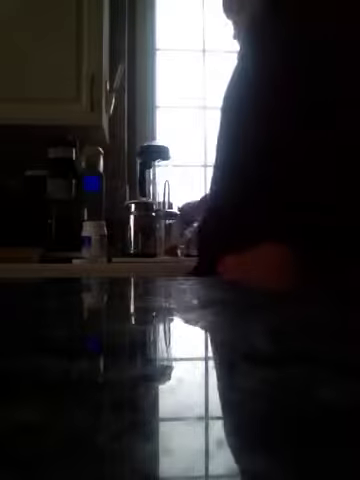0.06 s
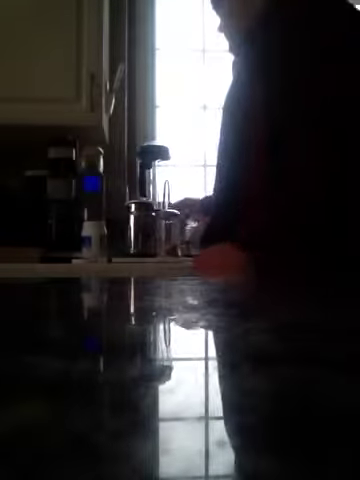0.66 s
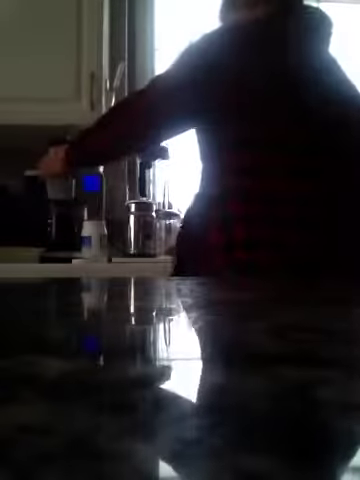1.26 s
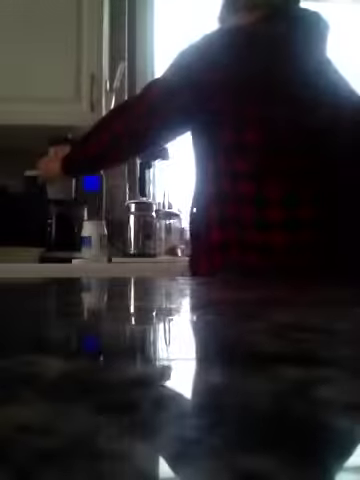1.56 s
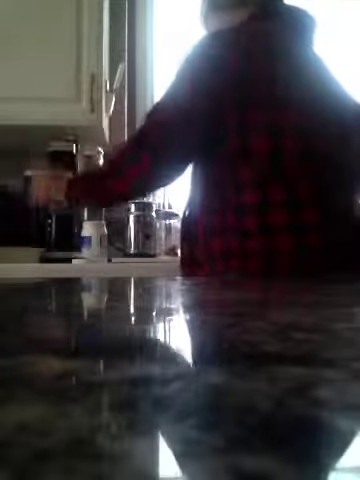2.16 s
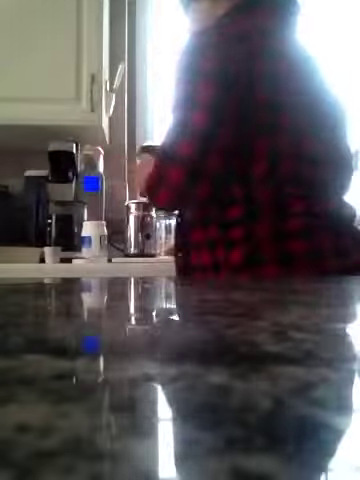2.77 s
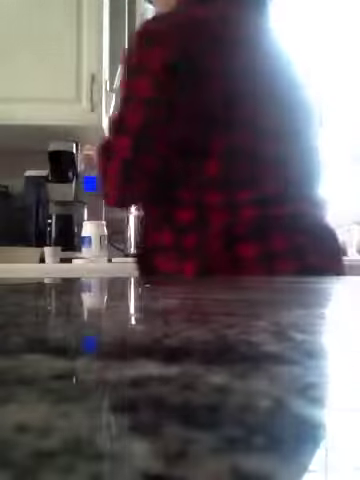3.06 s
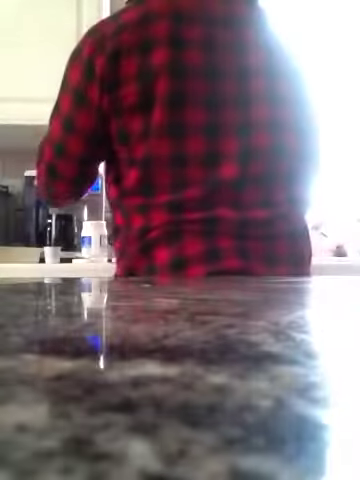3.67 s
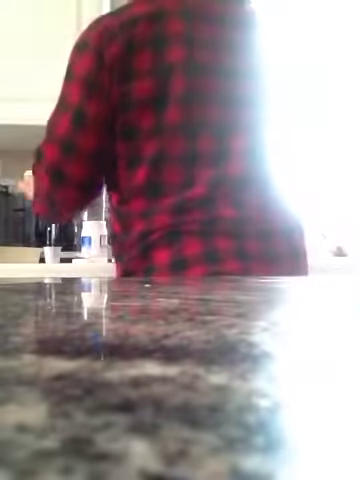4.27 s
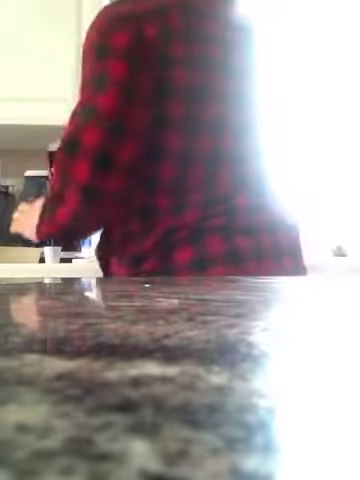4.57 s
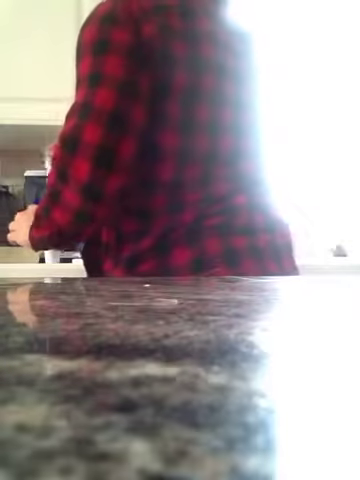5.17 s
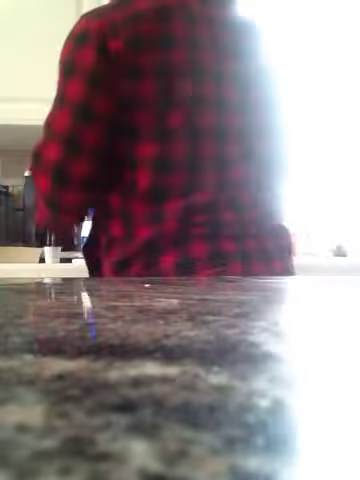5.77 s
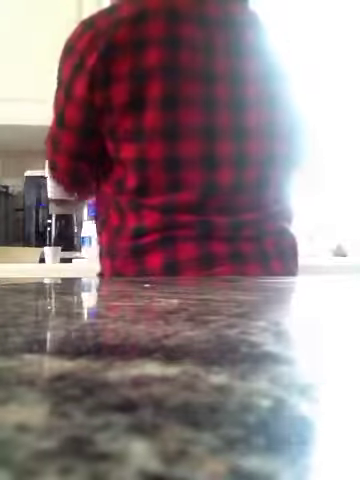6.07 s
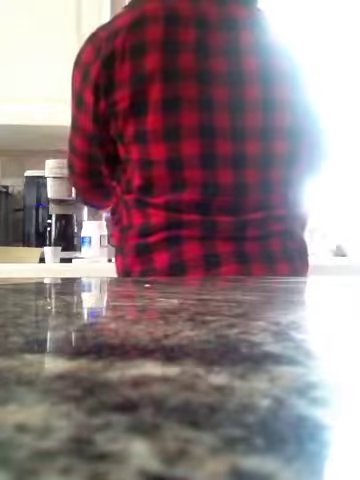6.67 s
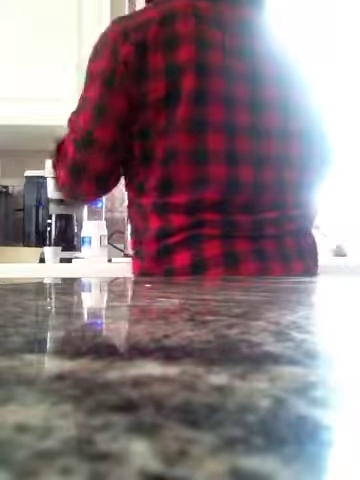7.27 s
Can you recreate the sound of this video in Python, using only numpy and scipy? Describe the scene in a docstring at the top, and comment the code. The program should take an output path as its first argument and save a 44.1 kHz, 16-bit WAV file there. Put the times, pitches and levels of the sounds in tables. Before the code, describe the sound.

Someone loads a single-cup coffee maker in a hard, echoing kitchen, a few steps from the microphone. Crockery clatters briefly, the plastic lid clicks and rubs open, and a cup is set on the counter. A pod is pressed in with small knocks, then a part slides and shuts with a loud clack. A click, soft knocks and a faint squeak follow over quiet room noise.

```python
"""Someone loads a single-cup coffee maker in a hard, echoing kitchen, a few steps from the microphone.
First crockery is picked up, then the plastic lid clicks and rubs open and a cup is set on the counter.
A pod is pressed in, and a part slides and shuts with a loud clack. A click, a few soft knocks and a
faint squeak come last. Each hit is a short burst of noise plus the ringing of the object that was hit;
rubbing is a stream of tiny slips. Quiet room noise lies under it all."""
import sys
import numpy as np
from scipy import signal
from scipy.fft import rfft, irfft, next_fast_len
from scipy.io import wavfile
from scipy.ndimage import uniform_filter1d

SR = 44100
rng = np.random.default_rng(int(sys.argv[2]) if len(sys.argv) > 2 else 0)


def persist_wave(psi):
    """Save psi, clipped to +-1, as 16-bit WAV."""
    counts = np.round(np.clip(psi, -1, 1) * 32767).astype(np.int16)
    wavfile.write(sys.argv[1], SR, np.atleast_2d(counts).T)


N = 331852

# The hits on each object: (time [s], level [dB], brightness [dB per octave])
NUDGE_HITS = [(.200, -59.5, 0), (.268, -59.5, -1.3), (.356, -56.5, -0.71), (.545, -51, 0.54),
              (.570, -55.5, 0.27), (.600, -69, .5)]
TICK_HITS = [(.3903, -49.5, -2.5), (.3972, -49, -1.5), (.4086, -46.5, 0), (.4153, -43.5, 3),
             (.523, -56, 14)]
CROCKERY_HITS = [(.7405, -39.5, 2), (.7473, -33, 2.5), (.7532, -38, -2.2), (.762, -42.5, 4.5),
                 (.7845, -52, -2.5)]
LID_HITS = [(1.504, -58.5, 4), (1.592, -47, 1.1), (1.668, -51.5, -0.8), (1.883, -50, 1.3),
            (1.9905, -38.5, 2.5), (2.035, -44.5, 0), (2.161, -48, 4), (2.896, -56, 0.4)]
BUMP_HITS = [(1.517, -54.5, -0.089), (1.547, -60, 0.8), (1.644, -53.5, 0.95), (1.690, -51.5, -0.16),
             (1.836, -51, 0.43), (1.981, -47, -1.06), (2.135, -63, -1)]
SNAP_HITS = [(1.389, -53.5, 1), (1.572, -52, -1.5), (1.975, -52, -1), (3.9705, -48, 0.5),
             (3.978, -46, -1.5), (4.050, -59.5, 2.5), (4.894, -46.5, 0), (4.925, -52, -2.5),
             (4.968, -51.5, 2), (4.985, -45.5, 0)]
CUP_HITS = [(2.4353, -33, 0)]
POD_HITS = [(3.5225, -47, -5), (3.529, -47, 3), (3.555, -61, 5), (3.613, -49, -5), (3.666, -64, -5),
            (3.672, -39, -1), (3.698, -61, 10.5), (3.742, -70, 5), (3.792, -47, 0)]
CLINK_HITS = [(3.786, -50.5, 0)]
LATCH_HITS = [(5.2002, -47, 5), (5.2065, -46.5, 2), (5.214, -31, 3.5), (5.2205, -32, 1.5),
              (5.236, -38, 3.5), (5.258, -32, -1.5), (5.269, -26, -3.5), (5.287, -18.5, -4.5)]
CLACK_HITS = [(5.2815, -18.5, 0.5), (5.2882, -19, 0.99), (5.291, -17, -0.4), (5.302, -23.5, -1),
              (5.317, -26, 1.5), (5.353, -31.5, 0.91)]
SWITCH_HITS = [(5.797, -50, 0.92), (5.802, -46.5, 0)]
THUD_HITS = [(6.317, -63, 1), (6.322, -48, -1.6)]
KNOCK_HITS = [(6.538, -53.5, 0.84), (6.549, -57, -0.11), (6.925, -66, -1.02), (6.947, -58, 0.098),
              (6.958, -54.5, -1.1)]

# The tone colour of each object's noise burst, from bass to treble: (frequency [Hz], level [dB])
NUDGE_TONE = [(100, -33), (300, -9), (470, -1.5), (930, 0), (1400, -6.5), (2000, -11), (4000, -10.5),
              (12000, -32)]
TICK_TONE = [(150, -41), (900, -2.5), (2000, -6.5), (2750, 7), (3300, 4), (4200, -3), (6500, -12.5),
             (9000, -21.5), (15000, -29)]
CROCKERY_TONE = [(80, -31), (200, -13.5), (350, -11.5), (500, -3), (950, 2), (1250, 5), (1650, -3.5),
                 (2500, 4), (3400, -0.5), (5000, -10.5), (8000, -19), (11500, -19.5), (15000, -31)]
LID_TONE = [(70, -21), (200, -13), (600, 5), (1300, -3.5), (1900, 1), (3000, -3.5), (6200, -7), (8200, -9),
            (10000, -3.5), (13000, -11), (15000, -24)]
BUMP_TONE = [(80, -25), (250, -6), (450, -20), (700, 10), (1100, -6.5), (3000, -9), (6000, -27),
             (15000, -45)]
SNAP_TONE = [(60, -30.5), (110, -12.5), (180, -0.5), (420, -3.5), (780, -1), (1300, -4.5), (2300, 0),
             (3500, -2), (6000, -13.5), (11500, -14.5), (15000, -25)]
CUP_TONE = [(40, -54), (70, -37), (100, -10), (250, -0.5), (650, -1), (950, -3.5), (1300, -1), (2000, -9),
            (3200, -11.5), (4500, -9.5), (7000, -15), (10000, -10), (15000, -23)]
POD_TONE = [(90, -39), (300, -6), (500, -9.5), (850, 6.5), (1400, -12), (3000, -16), (6000, -35),
            (12000, -40), (15000, -46)]
CLINK_TONE = [(150, -10), (1200, -4), (2000, -35), (4000, 5), (6000, -19), (11000, -1.5), (15000, -22)]
LATCH_TONE = [(100, -31), (200, -16.5), (520, -14), (780, 2.5), (1100, -11.5), (1600, -10), (2200, -1.5),
              (3300, -6), (4500, -23), (11000, -32.5), (15000, -43.5)]
CLACK_TONE = [(25, -46), (70, -38.5), (115, -26), (160, -11.5), (300, -1.5), (420, -3), (720, -5.5),
              (1050, 1), (1500, -6), (2200, -7.5), (3500, -11.5), (6000, -17), (11500, -18.5), (15500, -21)]
SWITCH_TONE = [(70, -20), (130, -10), (280, -0.5), (500, -6.5), (2000, -11), (6000, -13), (12000, -11.5),
               (15500, -17)]
THUD_TONE = [(90, -53), (300, -6.5), (410, 2), (600, -3), (1100, -6), (2000, -19), (4000, -28),
             (12000, -56)]
KNOCK_TONE = [(80, -38), (180, -7), (500, -1), (900, 4), (1400, -4.5), (2000, -3.5), (4000, -20.5),
              (12000, -44)]

# The notes each object rings with: (frequency [Hz], energy against the burst [dB], time to fade 60 dB [s])
TICK_NOTES = [(2900, -25, .03), (3240, -34, .1), (3580, -10, 0.073)]
CROCKERY_NOTES = [(915, -8.5, 0.059), (1255.4, -11.5, 0.27), (1980, -19, 0.2), (2550, -18, 0.11),
                  (2910, -19, .1), (3490, -19.5, 0.34)]
LID_NOTES = [(224, -12.5, 0.12), (319, -15, 0.17), (1857, -13, 0.086), (4760, -16.5, 0.1),
             (5700, -36, 0.11), (7550, -20, 0.072), (9420, -11.5, 0.15), (9200, -20, 0.078),
             (11100, -21, 0.11)]
BUMP_NOTES = [(683, -1.1, 0.055), (790, -0.22, 0.071)]
SNAP_NOTES = [(185, -23.5, 0.14), (335, -17, 0.45), (580, -22, 0.07), (773.4, -14.5, 0.074),
              (3830, -20.5, 0.07)]
CUP_NOTES = [(466, -9, 0.055), (665, -3.5, 0.03), (810, -13, 0.053), (1300, -17, 0.14), (1860, -15, 0.11),
             (2600, -14, 0.044), (3960, -17, 0.069), (4530, -20, 0.053), (6540, -17, 0.053),
             (8600, -14, 0.036)]
POD_NOTES = [(765, -1.5, 0.067), (898, -4, 0.16), (1010, -16, 0.048), (1280, -16, 0.082),
             (2290, -21, 0.071), (5290, -26, 0.069)]
CLINK_NOTES = [(1164, 3, 0.058), (2288, -13, 0.24), (3700, -5, 0.074), (4000, -12, .1), (7219, -13, .1),
               (10150, -21, .12)]
LATCH_NOTES = [(655, -7.5, 0.039), (790, 1.5, 0.029)]
CLACK_NOTES = [(202, -23.5, 0.19), (403.7, -12, 0.15), (452, -14, 0.067), (674, -11.5, 0.067),
               (704.7, -13.5, 0.097), (750, -13.5, 0.09), (1040, -16, 0.13), (1098, -24, 0.18),
               (1400, -25, 1), (1705, -16.5, 0.064), (1787, -16.5, 0.12), (2240, -23, .14),
               (2313, -21, 0.16), (3760, -21.5, 0.077), (4620, -23, .06)]
SWITCH_NOTES = [(678, -9, 0.07), (7150, -15, .1)]
THUD_NOTES = [(402, 1.8, 0.094)]
KNOCK_NOTES = [(421, -12, 0.092), (766, -8.5, 0.11), (1056, -19, .15)]

# Pushes of the hand that drag a part: (start [s], length [s], rubbing level [dB], rumble level [dB])
HAND_STROKES = [(0.257, 0.041, -59.5, -87), (0.558, 0.034, -58, -89), (1.42, .12, -65.5, -87),
                (1.582, 0.13, -65.5, -68.5), (1.82, 0.16, -61, -74.5), (2.02, 0.038, -58, -56.5),
                (2.11, 0.075, -63.5, -64.5), (3.617, 0.099, -59, -76), (4.727, 0.13, -63, -69.5),
                (4.872, .15, -54.5, -73), (7.402, 0.082, -83, -68)]
# The tone colour of rubbing plastic, the hollow housing and the room noise: (frequency [Hz], level [dB])
RUB_TONE = [(70, -32.5), (200, -7.5), (400, -10), (850, -2.5), (1400, -2.5), (2500, -3.5), (5000, -15.5),
            (12000, -15.5), (15500, -30.5)]
HOUSING_TONE = [(50, -33), (95, -8), (140, -8), (230, 1.5), (310, -1.5), (420, -6), (800, -22.5),
                (2000, -50.5)]
ROOM_TONE = [(15, -61), (25, -25.5), (69, -26.5), (104, -6.5), (173, 0), (267, 0.5), (340, -0.5),
             (445, -4.5), (703, -7), (804, -8.5), (895, -8), (1900, -10.5), (3440, -13), (14300, -12),
             (15500, -13)]
# How long sound hangs in the kitchen: (frequency [Hz], time to fade 60 dB [s])
KITCHEN_FADE = [(100, 0.5), (400, 0.53), (1200, 0.63), (2500, 0.61), (5000, 0.58), (9000, 0.37),
                (15000, 0.11)]
# Echoes from the counter, wall and cupboards: (delay [s], gain [factor])
NEAR_ECHOES = [(.0016, 0.27), (.0031, 0.15), (.0073, 0.33), (0.0102, 0.24), (0.0161, .25), (.021, .28)]


def shutting():
    """The latch catches and the part shuts with a clack, the loudest sound here."""
    latch = struck(LATCH_HITS, LATCH_TONE, LATCH_NOTES, burst_s=0.016, tail_db=-2)
    return latch + struck(CLACK_HITS, CLACK_TONE, CLACK_NOTES, burst_s=0.035, tail_db=-5)


def crockery():
    """Crockery is nudged gently, then ticks and rings as it is picked up."""
    nudges = struck(NUDGE_HITS, NUDGE_TONE, CROCKERY_NOTES, burst_s=0.059, tail_db=-2, contact_s=0.018)
    ticks = struck(TICK_HITS, TICK_TONE, TICK_NOTES, burst_s=0.018, tail_db=-4.5)
    clatter = struck(CROCKERY_HITS, CROCKERY_TONE, CROCKERY_NOTES, burst_s=0.031, tail_db=-4.5)
    return nudges + ticks + clatter


def cup_down():
    """A cup meets the counter in one hard hit."""
    return struck(CUP_HITS, CUP_TONE, CUP_NOTES, burst_s=0.015, tail_db=-4.5)


def lid():
    """The plastic lid clicks, bumps and snaps as the hand works it; the same snaps also carry the clicks of the
    sliding part just before it shuts."""
    clicks = struck(LID_HITS, LID_TONE, LID_NOTES, burst_s=0.025, tail_db=0.5)
    bumps = struck(BUMP_HITS, BUMP_TONE, BUMP_NOTES, burst_s=0.019, tail_db=-4.5, contact_s=0.004)
    snaps = struck(SNAP_HITS, SNAP_TONE, SNAP_NOTES, burst_s=0.032, tail_db=-1.5)
    return clicks + bumps + snaps


def pod():
    """The pod knocks as it is pressed in, with one bright clink near the end."""
    knocks = struck(POD_HITS, POD_TONE, POD_NOTES, burst_s=0.018, tail_db=-5.5, contact_s=0.003)
    return knocks + struck(CLINK_HITS, CLINK_TONE, CLINK_NOTES, burst_s=0.02, tail_db=-1)


def switch():
    """A switch clicks: two small hits, very close together."""
    return struck(SWITCH_HITS, SWITCH_TONE, SWITCH_NOTES, burst_s=0.034, tail_db=0, contact_s=0.0025)


def soft_knocks():
    """Gentle contacts make a dull thud and then a few knocks."""
    thud = struck(THUD_HITS, THUD_TONE, THUD_NOTES, burst_s=0.04, tail_db=-5.5, contact_s=0.0061)
    knocks = struck(KNOCK_HITS, KNOCK_TONE, KNOCK_NOTES, burst_s=0.039, tail_db=-3.5, contact_s=0.0031)
    return thud + knocks


def struck(hits, tone, notes, burst_s, tail_db, contact_s=0.00036, size=16384):
    """Each hit makes a burst of noise and rings the object, with its own loudness and brightness."""
    t, hz = np.arange(size) / SR, np.fft.rfftfreq(size, 1 / SR)
    body = tone_filter(look_up(tone, hz))
    # Little sound leaves the object below its lowest note.
    bass_cut = signal.butter(3, 0.7 * notes[0][0], "high", fs=SR, output="sos")
    rings = np.array([gain_of(db) * unit(np.sin(2 * np.pi * note_hz * t) * fade(t, fade_s))
                      for note_hz, db, fade_s in notes])
    octaves = np.log2(np.clip(hz, 300, 12000) / 1000)
    hit_scale = np.sqrt(0.02 * SR)  # a hit's level counts its energy as if spread over 20 ms
    out = np.zeros(N)
    for start, db, brightness in hits:
        noise = noise_burst(t[:size // 4], burst_s, contact_s)
        burst = unit(irfft(rfft(noise, size) * body))
        # Where the hit lands decides which way each note first swings.
        ring = signal.sosfilt(bass_cut, rng.choice([-1, 1], len(notes)) @ rings)
        hit = unit(irfft(rfft(burst + ring) * tone_filter(brightness * octaves)))
        # Each hit gets its own random room tail, so the echoes blur without ringing.
        add(out, start, kitchen(gain_of(db) * hit_scale * hit, tail_db))
    return out


def noise_burst(t, fade_s, contact_s):
    """Many short vibrations blur into noise that swells while two surfaces meet, then fades."""
    envelope = (1 - np.exp(-t / contact_s)) * fade(t, fade_s)
    return flattened(rng.standard_normal(len(t)) * envelope, bins=41)


def rubbing(slips_per_s=2500, spread_db=1.5):
    """Plastic sticks and slips on plastic in tiny uneven clicks, which also shake the hollow housing."""
    slips = (rng.random(N) < slips_per_s / SR) * rng.standard_normal(N)
    slips *= gain_of(spread_db * np.minimum(rng.exponential(1, N), 4))
    drag, push = np.zeros(N), np.zeros(N)
    for start, length, rub_db, rumble_db in HAND_STROKES:
        hand = hand_pressure(start, length)
        drag = np.maximum(drag, gain_of(rub_db) * hand)
        push = np.maximum(push, gain_of(rumble_db) * hand)
    rub = coloured(slips, RUB_TONE) * drag
    rumble = coloured(slips, HOUSING_TONE) * push
    return kitchen(rub + rumble, tail_db=-2)[:N]


def hand_pressure(start, length, grip_db_per_s=396, release_db_per_s=201.5):
    """One stroke: the hand takes hold, pushes evenly and lets go."""
    t = np.arange(N) / SR - start
    return gain_of(-grip_db_per_s * np.maximum(-t, 0) - release_db_per_s * np.maximum(t - length, 0))


def squeak(start_s=7.27, length_s=0.093, level_db=-72, start_hz=1800, rise_hz_per_s=3800, width_hz=280):
    """A dry spot slips and sounds one faint, rough note that slides upward."""
    t = np.arange(SR // 4) / SR
    swell = np.sin(np.pi * np.minimum(t / length_s, 1))
    smoothing = signal.butter(2, width_hz / 2, fs=SR, output="sos")
    roughness = signal.sosfilt(smoothing, rng.standard_normal(len(t)))
    phase = 2 * np.pi * np.cumsum(start_hz + rise_hz_per_s * t) / SR
    note = unit(roughness * np.sin(phase)) * np.sqrt(len(t))
    out = np.zeros(N)
    add(out, start_s, kitchen(gain_of(level_db) * swell * note, tail_db=-4))
    return out


def kitchen(x, tail_db, build_s=0.0028, size=24576):
    """Sound arrives directly, then as nearby echoes, then as a blurred tail whose treble dies first."""
    hz, t, bands = signal.stft(rng.standard_normal(size), SR, nperseg=256)
    bands = bands * fade(t, look_up(KITCHEN_FADE, hz)[:, None])
    tail = signal.istft(bands, SR)[1][:size]
    tail *= 1 - np.exp(-np.arange(size) / SR / build_s)
    early = np.zeros(size)
    early[0] = 1  # the direct sound
    for delay, gain in NEAR_ECHOES:
        add(early, delay, np.array([gain]))
    room = flattened(unit(early) + gain_of(tail_db) * unit(tail), bins=151)
    return signal.fftconvolve(x, room)


def room_noise(level_db=-67):
    """The low murmur of the house and the microphone's even hiss."""
    return gain_of(level_db) * coloured(rng.standard_normal(N), ROOM_TONE)


def gain_of(db):
    """Turns decibels into a number to multiply by."""
    return 10 ** (np.asarray(db) / 20)


def fade(t, fade_s):
    """A curve that falls by 60 dB, to a thousandth, in fade_s seconds."""
    return np.exp(-np.log(1000) * t / fade_s)


def unit(x):
    """Scales a sound to an energy of one."""
    return x / np.sqrt(np.sum(x ** 2) + 1e-20)


def look_up(table, hz):
    """Reads between a table's rows, giving each octave about the same space."""
    row_hz, value = np.transpose(table)
    return np.interp(np.log(hz + 1), np.log(row_hz + 1), value)


def add(mix, start_s, sound):
    """Mixes a sound in at the given time."""
    part = mix[round(start_s * SR):][:len(sound)]
    part += sound[:len(part)]


def coloured(x, tone):
    """Gives a long sound a tone colour and an average power of one."""
    size = next_fast_len(N)
    gains = gain_of(look_up(tone, np.fft.rfftfreq(size, 1 / SR)))
    return unit(irfft(rfft(x, size) * gains, size)[:N]) * np.sqrt(N)


def tone_filter(db):
    """Turns a level for each frequency into a filter that lets nothing sound before the hit."""
    log_gain = np.log(gain_of(np.r_[db, db[-2:0:-1]]))
    return np.exp(np.conj(signal.hilbert(log_gain)))[:len(db)]


def flattened(x, bins):
    """Evens out humps wider than `bins` frequency steps in a noise; the fine grain stays."""
    spectrum = rfft(x)
    power = uniform_filter1d(abs(spectrum) ** 2, bins)
    return unit(irfft(spectrum * tone_filter(-10 * np.log10(abs(power) + 1e-12))))


def scene():
    """All the handled objects and the room noise, mixed into one channel."""
    hits = shutting() + crockery() + cup_down() + lid() + pod() + switch() + soft_knocks()
    return (hits + rubbing() + squeak() + room_noise())[None]


def record(dry, cutoff_hz=15480):
    """The recorder cuts off the very highest treble."""
    treble_cut = signal.firwin(511, cutoff_hz, window=("kaiser", 9), fs=SR)
    return signal.oaconvolve(dry, treble_cut[None], "same")


dry = scene()
out = record(dry)
persist_wave(out)
```